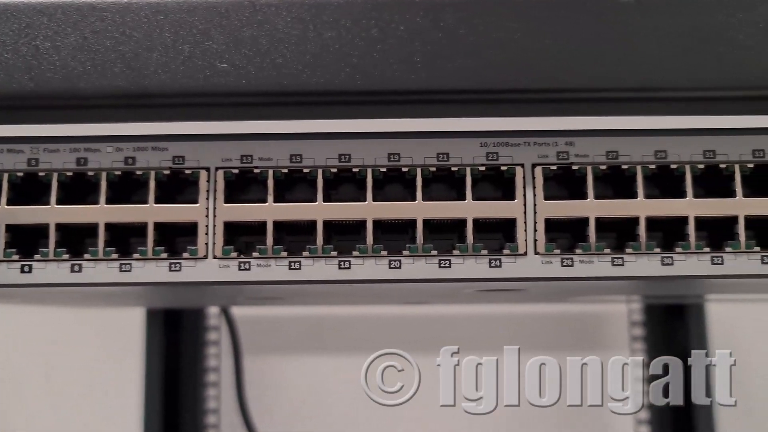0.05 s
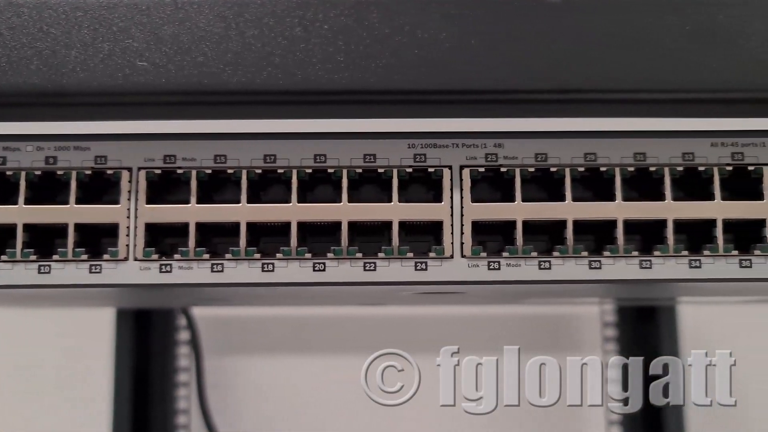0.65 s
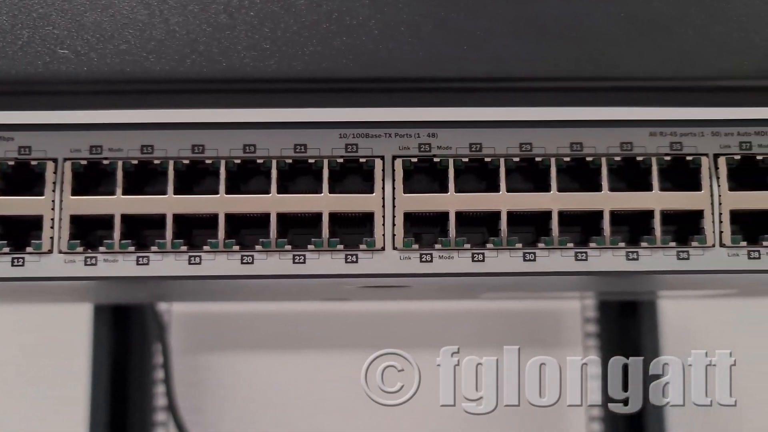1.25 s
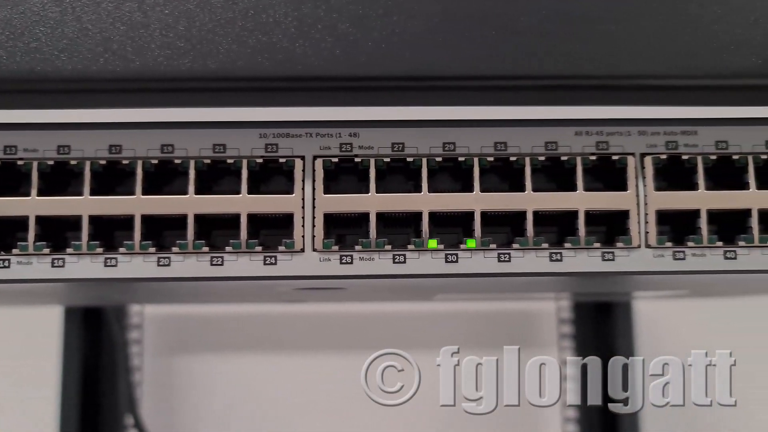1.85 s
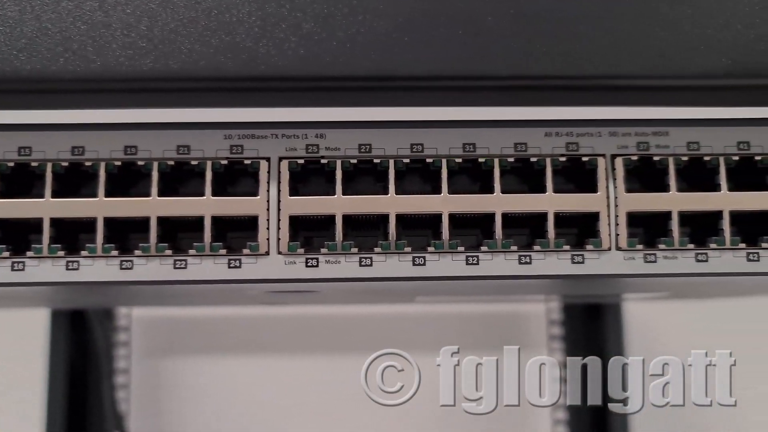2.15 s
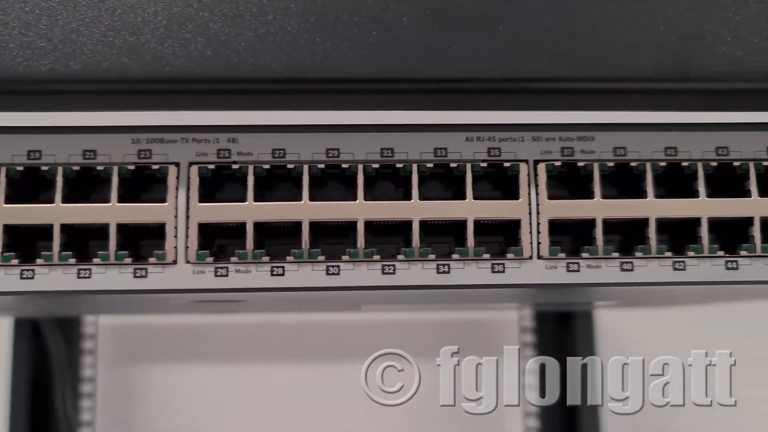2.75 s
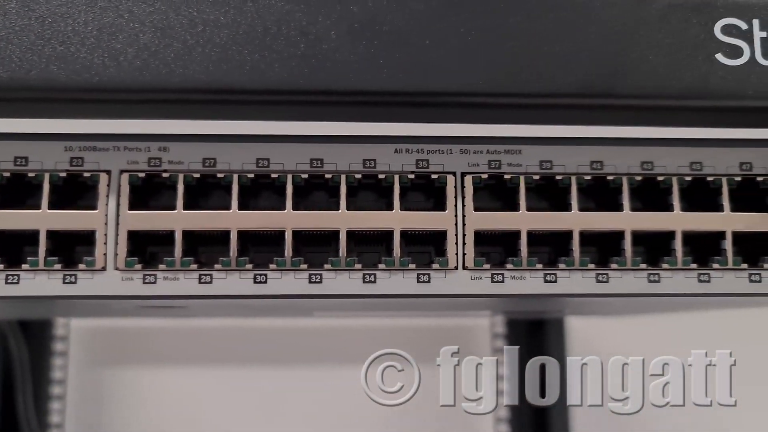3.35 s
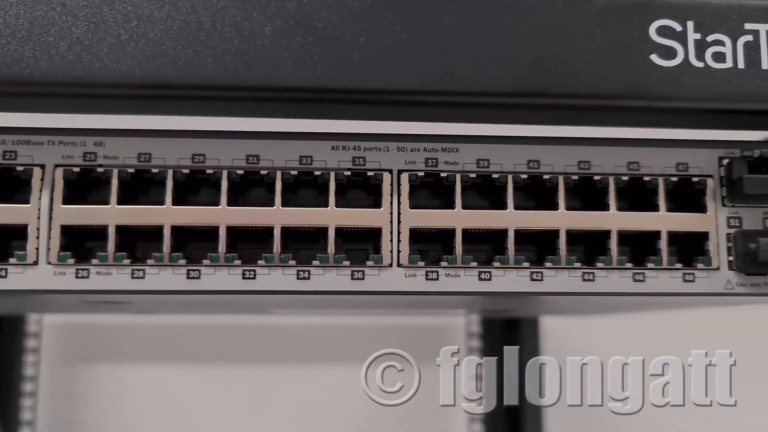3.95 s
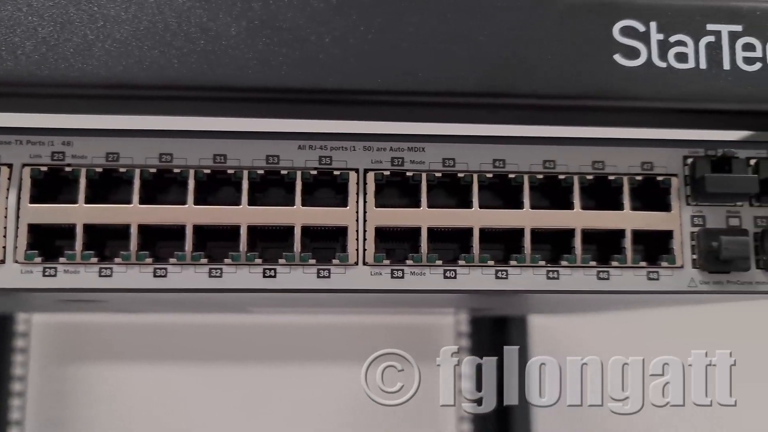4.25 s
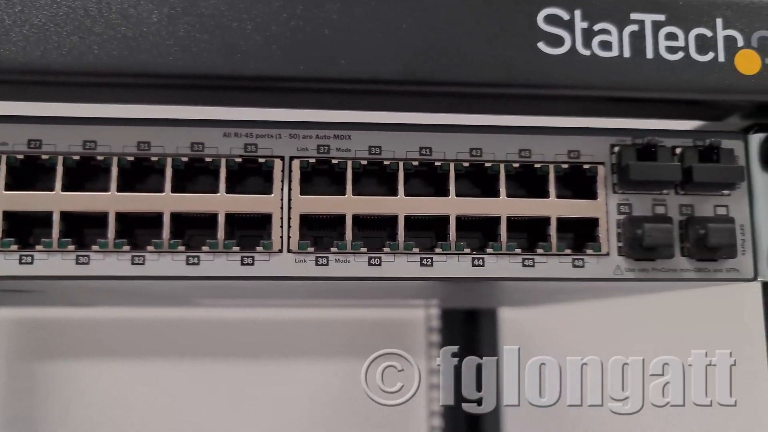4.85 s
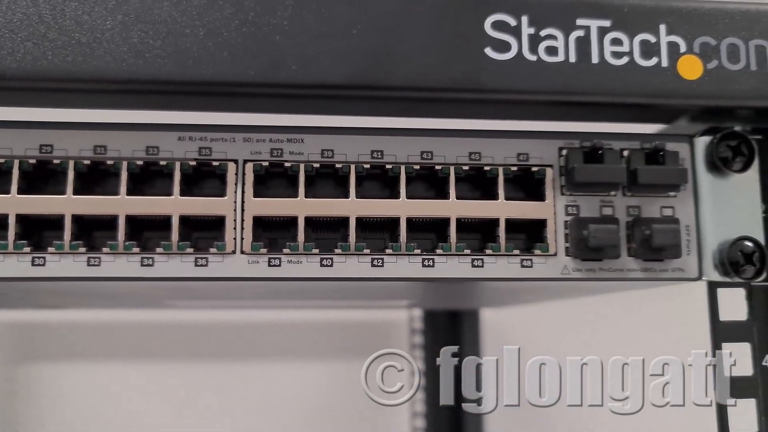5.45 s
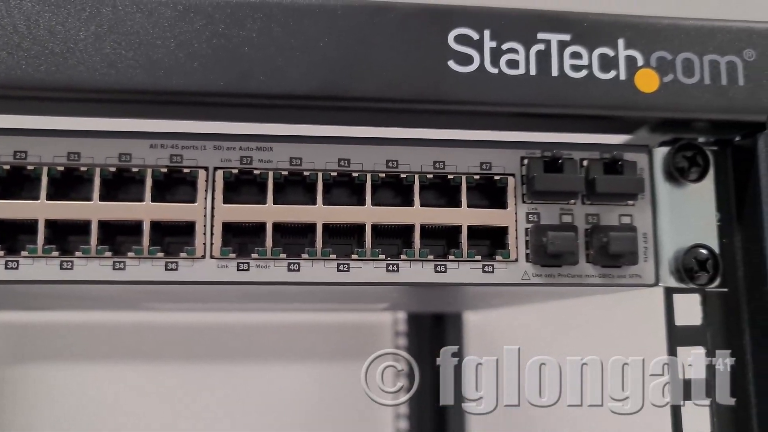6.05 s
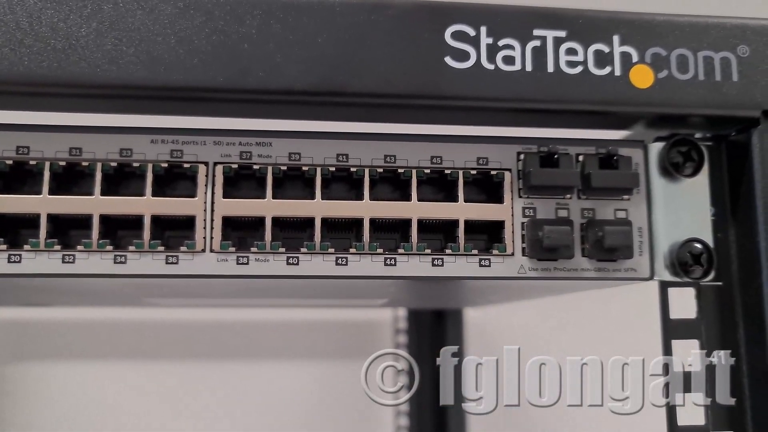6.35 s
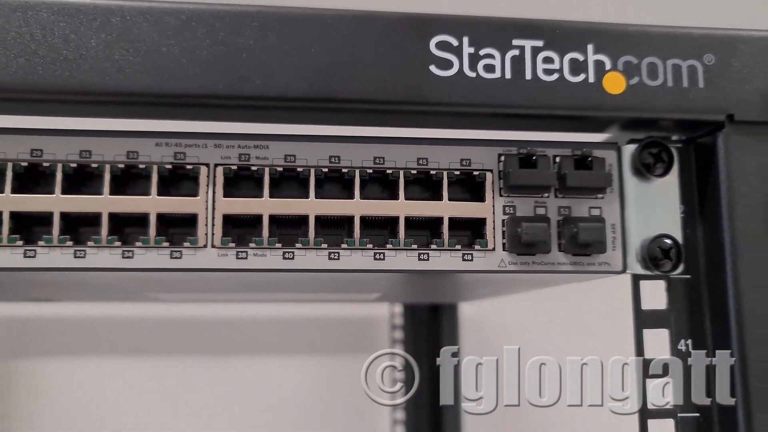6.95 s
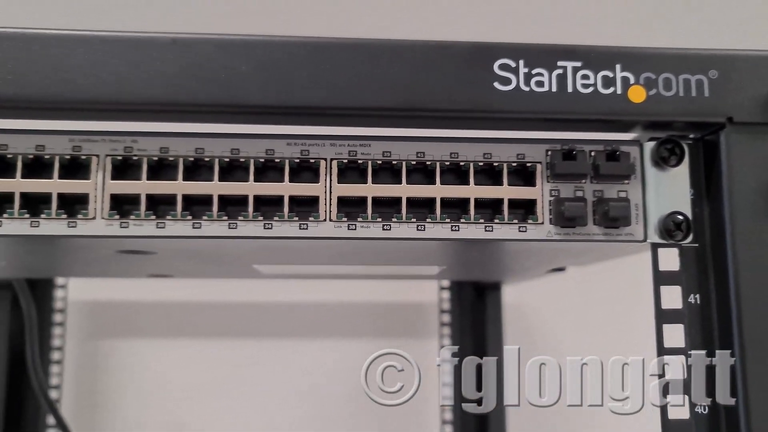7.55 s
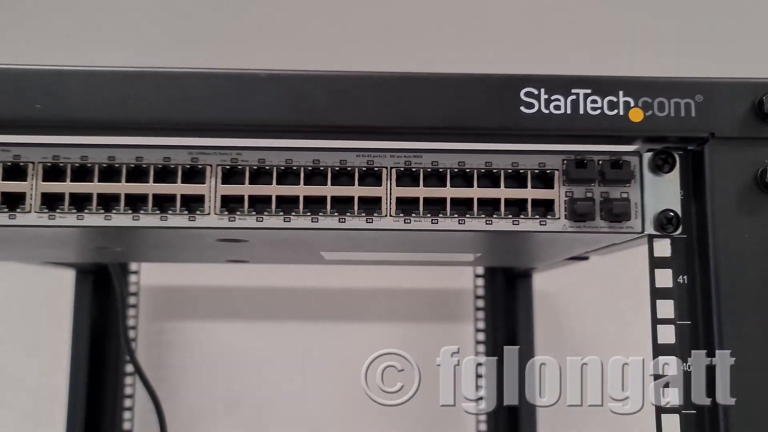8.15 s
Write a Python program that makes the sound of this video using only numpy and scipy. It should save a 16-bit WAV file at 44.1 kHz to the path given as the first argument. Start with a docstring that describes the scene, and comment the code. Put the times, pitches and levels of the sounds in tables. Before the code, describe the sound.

Small cooling fans in a rack-mounted network switch whirr for the whole eight seconds, heard close up in a small room. A mid-pitched hum leads, with several higher whines above it and air hissing through the vents. The speed stays constant, but each tone swells and fades as a hand-held stereo microphone slides along the front. Thin bearing whistles waver faintly, and a very faint, high electronic buzz and hiss hold steady. Underneath, the room's ventilation rumbles with an uneven low throb. At about 1.2 seconds there is one tiny, bright tick. From around 3 seconds the main hum leans to the left. The low drone swells around 4 seconds and again near 6 to 6.5 seconds. As the microphone draws back after 7 seconds, the hum dips briefly at about 7.5 seconds, then returns more centred, and the fans keep running.

```python
"""Network switch fans, close up

In a small room, a hand-held stereo microphone pair slides along the face of a rack-mounted switch, then
draws back. The seven-blade fans whirr, each tone swelling and fading as the microphones cross its standing
waves. Air hisses in the vents, bearings whistle, the room's ventilation rumbles, the electronics whine
faintly, and there is one tiny tick."""
import sys
import numpy as np
from scipy.fft import rfft, irfft, next_fast_len
from scipy.io import wavfile
from scipy.ndimage import map_coordinates

SR = 44100
rng = np.random.default_rng(int(sys.argv[2]) if len(sys.argv) > 2 else 0)


def materialize(psi):
    """Save the field psi as 16-bit PCM at rate SR to the path in sys.argv[1].

    A 1-D psi becomes a single channel; in a 2-D psi each row is a channel.
    """
    bounded = np.clip(np.atleast_2d(psi).T, -1, 1)
    quanta = np.round(bounded * 32767).astype(np.int16)
    wavfile.write(sys.argv[1], SR, quanta)


N = 361619


def amp(db):
    """Decibels to gain."""
    return 10 ** (np.asarray(db) / 20)


def unit(x):
    """Scale to rms 1."""
    return x / np.sqrt(np.mean(x ** 2) + 1e-20)


def along(points, hz):
    """Read (pitch_hz, value) points on a log axis."""
    pitches, values = np.transpose(points)
    return np.interp(np.log(hz + 1), np.log(pitches + 1), values)


def curves(rows):
    """One value per sample for each column after the time."""
    times, *columns = np.transpose(rows)
    return np.array([np.interp(np.arange(N) / SR, times, column) for column in columns])


def wobble(rate):
    """A smooth random curve, rate knots a second."""
    coarse = np.linspace(0, N / SR, 2048)
    smooth = map_coordinates(rng.standard_normal(1024), [coarse * rate], mode="wrap")
    return np.interp(np.arange(N) / SR, coarse, smooth)


# Which microphone each pitch favours: pitch_hz, left_minus_right_db
BALANCE = [(80, -0.3), (200, 0.5), (400, 2.5), (800, -1), (1500, 0), (1900, 4), (2600, 4.5), (3500, 0),
           (4500, -3), (5200, 0), (6000, 2.5), (8800, -5), (11000, 0), (14000, 1.5)]
def sides(hz):
    """Left and right gain at a pitch."""
    half = along(BALANCE, np.atleast_1d(hz)) / 2
    return amp(np.array([half, -half]))


# How alike the two microphones hear the air: pitch_hz, likeness_ratio
LIKENESS = [(40, 0.98), (100, 0.76), (450, 0.94), (740, 0.5), (1200, 0.07)]
def rush(density):
    """Stereo noise shaped by density(hz); the microphones agree only in the bass."""
    size = next_fast_len(N)
    hz = np.fft.rfftfreq(size, 1 / SR)
    spread = np.arccos(along(LIKENESS, hz)) / 2
    mid, side = rfft(rng.standard_normal((2, size))) * [np.cos(spread), np.sin(spread)]
    spectrum = np.array([mid + side, mid - side]) * sides(hz) * density(hz)
    return irfft(spectrum, size)[:, :N] * np.sqrt(SR / 2)


def shaped(spectrum):
    """Stereo noise from (pitch_hz, density_db) points."""
    return rush(lambda hz: amp(along(spectrum, hz)))


def tone(phase, lead, flutter):
    """A stereo tone, the left ahead by lead radians; turbulent inflow shakes its size and phase."""
    size = 1 + flutter * wobble(rate=22)
    phase = phase + rng.uniform(0, 2 * np.pi) + flutter * wobble(rate=22)
    return np.sqrt(2) * size * np.sin([phase + lead / 2, phase - lead / 2])


def roaming(phase, hz, fade_db, flutter):
    """A tone whose level and phase drift at random, as when microphones cross standing waves."""
    spread = np.arccos(along(LIKENESS, hz))
    lead = spread * (rng.choice([-1, 1]) + 0.5 * wobble(rate=0.85))
    fading = unit(amp(fade_db * np.array([wobble(rate=1.33), wobble(rate=1.57)])))
    return sides(hz) * fading * tone(phase, lead, flutter)


# Blade-passing tone at the microphones, before trim: time_s, left_db, right_db
BLADE_LEVELS = [(0, -43.5, -43.5), (1.3, -44, -46), (1.4, -40.5, -43), (1.8, -44, -47), (2, -42, -44.5),
                (3.3, -46, -52.5), (3.5, -42.5, -48), (5.29, -44.5, -55), (5.49, -42, -51),
                (5.69, -44.5, -54.5), (6.79, -46.5, -57), (7.39, -44.5, -50), (7.49, -57, -66),
                (7.69, -49, -49.5), (8.19, -45.5, -47.5)]
def blade_tone(shaft, path, blades=7, trim_db=0.76):
    """Each passing blade pulses the air; the left microphone gains phase along the path."""
    return amp(curves(BLADE_LEVELS) + trim_db) * tone(blades * shaft, -0.12 + 0.75 * path, flutter=0.059)


# Loudest whines by shaft multiple, before trim: time_s, left_db, right_db, left_lead_rad
FAN_WHINES = {30: [(0.0, -50, -48.5, 2.65), (0.9, -51.5, -49, 4.1), (2.4, -58, -51, 2.8),
              (2.9, -64.2, -50, 4.9), (3.1, -57.5, -49.5, 8.3), (5.7, -50, -57.5, 5.6),
              (7.1, -50.5, -53, 6.6), (7.3, -53.8, -58, 7.1), (8.1, -52, -55.5, 5.6)],
              36: [(0.0, -60, -57.5, 1.5), (1.9, -54, -46, 3), (2.5, -57, -52, 2.6), (3.2, -53.5, -59, 2.5),
              (5.2, -51.5, -54, 1.8), (6.1, -61.2, -53, 1.0), (7.1, -58.5, -54, -0.7),
              (7.5, -51.5, -61.5, 1.5), (8.1, -63, -67, 4)], 42: [(0.0, -65, -67.6, -1.5),
              (1.6, -61, -82.5, -5), (1.7, -63.6, -81.1, 3), (2.4, -62, -79, 1.8), (2.8, -54.5, -64.8, 3),
              (4.8, -53.5, -59.3, 2), (6.2, -54.0, -68, 4), (7.8, -51, -62.1, 0.9), (8.1, -58.5, -76, 0)]}
def fan_whines(shaft, trim_db=0.5):
    """Blades and motor poles sound three high multiples of the shaft rate."""
    out = 0
    for multiple, rows in FAN_WHINES.items():
        *level_db, lead = curves(rows)
        out += amp(np.array(level_db) + trim_db) * tone(multiple * shaft, lead, flutter=0.087)
    return out


def standing_wave(path, db, echo, node, spacing):
    """Gain along the path of a direct wave plus its echo; they partly cancel at evenly spaced nodes."""
    return amp(db) * np.abs(1 - np.clip(echo, 0, 1) * np.exp(2j * np.pi * (path - node) / spacing))


# Standing waves in front of the rack, before trim: shaft_multiple, then for left and for right
# (direct_db, echo_ratio, node_faces, spacing_faces), then left_lead_rad, lead_rad_per_face
OVERTONE_WAVES = [(12, -60.5, 0.71, 0.58, 0.93, -61, 0.91, 1.48, 1.87, 2, -0.06),
                  (24, -68, 0.54, 1.1, 1.26, -59.5, 0.19, 1.2, 1.05, -3, 0.76),
                  (31, -61.5, 0.96, 0.22, 1.5, -66, 0.32, 0.77, 2.5, 0, 0.4),
                  (32, -60, 0.62, 0.02, 1.45, -72, 0.29, 0.45, 1, -2, 0.4),
                  (40, -62.5, 0.31, 0.73, 2.4, -69.5, 0.45, 0.81, 1.6, 1.2, 0.2)]
def fan_overtones(shaft, path, trim_db=0.75):
    """Clear overtones dip as each microphone passes through their nodes."""
    out = 0
    for multiple, *waves, lead, lead_slope in OVERTONE_WAVES:
        gains = np.array([standing_wave(path, *wave) for wave in np.reshape(waves, (2, -1))])
        out += amp(trim_db) * gains * tone(multiple * shaft, lead + lead_slope * path, flutter=0.093)
    return out


# Faint tones of the main fan, before trim: shaft_multiple, level_db
WEAK_TONES = [(4, -68), (5, -65), (9, -68), (10, -67), (13, -72), (14, -71), (16, -72), (17, -68),
              (20, -74), (28, -64), (29, -71), (33, -67), (34, -68), (35, -66), (38, -71), (41, -65),
              (43, -73)]
def weak_tones(shaft, mean_hz, trim_db=0.3):
    """Faint shaft harmonics drift in and out at each microphone."""
    return sum(amp(db + trim_db) * roaming(multiple * shaft, multiple * mean_hz, fade_db=2.5, flutter=0.28)
               for multiple, db in WEAK_TONES)


def whirr(shaft, gain_db=8.5, size=1024):
    """Small flaws of the blades repeat every turn: a dense comb of faint lines in a drifting mix."""
    hz = np.arange(size // 2 + 1) * SHAFT_SPEED[0][1]
    colour = sides(hz) * amp(along(AIRFLOW, hz)) * (hz > 0)
    # three random patterns, one turn long, for each microphone
    patterns = irfft(rfft(rng.standard_normal((3, 2, size))) * colour) * np.sqrt(size / 2)
    angle = np.arange(size) * 2 * np.pi / size
    mix = np.array([wobble(rate=0.91) for _ in patterns])
    mix /= np.sqrt(np.sum(mix ** 2, axis=0) + 0.14)
    out = 0
    for share, pair in zip(mix, patterns):
        out += share * np.array([np.interp(shaft, angle, side, period=2 * np.pi) for side in pair])
    return amp(gain_db) * out


# Rotation of the main fan: time_s, speed_hz
SHAFT_SPEED = [(0.0, 56.822), (0.6, 56.791), (0.7, 56.754), (1.2, 56.806), (2.8, 56.849), (3.0, 56.884),
               (3.2, 56.956), (3.7, 56.861), (3.9, 56.915), (5.1, 56.813), (5.5, 56.865), (5.7, 56.84),
               (6.0, 56.922), (6.3, 56.906), (6.9, 57.005), (7.6, 56.832), (7.9, 56.86), (8.1, 56.932)]
def main_fan(path):
    """One slightly unsteady shaft drives all the tones of the loudest fan."""
    speed = curves(SHAFT_SPEED)[0] + 0.0066 * wobble(rate=6)
    shaft = 2 * np.pi * np.cumsum(speed) / SR
    clear_tones = blade_tone(shaft, path) + fan_whines(shaft) + fan_overtones(shaft, path)
    return clear_tones + weak_tones(shaft, speed.mean()) + whirr(shaft)


# Other fans in the case: pitch_hz, level_db
NEIGHBOUR_TONES = [(319, -63), (375, -60), (434, -61), (463, -64), (1688, -67), (1755, -67), (2500, -74),
                   (3275, -74), (5798, -87), (5965, -89)]
def other_fans():
    """Neighbouring fans wander in speed together and beat against the main one."""
    time = np.cumsum(1 + 0.0005 * wobble(rate=2.5)) / SR
    return sum(amp(db) * roaming(2 * np.pi * hz * time, hz, fade_db=5.5, flutter=0.29)
               for hz, db in NEIGHBOUR_TONES)


# Whistling spots along the path: pitch_hz, loudest_db, place_faces, loss_db_per_face
BEARING_WHISTLES = [(3125, -70, 1.0, 14), (3415, -70, 0.49, 43), (3467, -66.5, 0.53, 30),
                    (3430, -76, 0.72, 15), (3440, -64, 1.8, 22), (5560, -75, 0.29, 12),
                    (5570, -77.5, 1.3, 13), (5450, -83, 1.15, 14)]
def bearings(path, waver=0.0015, flicker_db=2.0):
    """Thin whistles waver and flicker, each growing as the microphones near its place."""
    out = 0
    for hz, db, place, loss_db in BEARING_WHISTLES:
        phase = 2 * np.pi * hz * np.cumsum(1 + waver * wobble(rate=7)) / SR
        flicker = unit(amp(flicker_db * wobble(rate=11)))
        gain = amp(db - loss_db * np.abs(path - place))
        out += gain * flicker * roaming(phase, hz, fade_db=-1.2, flutter=0.49)
    return out


# Air through the fans and vent holes, close up: pitch_hz, density_db
AIRFLOW = [(60, -100), (150, -80.5), (290, -79.5), (450, -77), (620, -84), (980, -83), (1450, -88.5),
           (2050, -84), (2500, -90), (3350, -89), (3750, -98), (5150, -103), (5700, -102), (6400, -108),
           (7400, -130)]
# Air resonances of the steel case: pitch_hz, width_hz, peak_density_db, place_faces, loss_one_face_away_db
CASE_RESONANCES = [(287, 41, -75, 0.47, 112), (394, 62, -70.5, 0.35, 5), (955, 103, -82, 0.55, 23),
                   (1160, 220, -85.5, 0.57, 150), (215, 39, -77, 0.55, 150), (1754, 200, -77, 1.37, 3),
                   (3100, 33, -79.5, 0.99, 25), (2920, 350, -89.5, 0.4, 0), (3405, 30, -79.5, 0.43, 75),
                   (4540, 550, -99.5, .2, 1), (5560, 390, -104, 0.37, 0), (5900, 370, -104, 0.02, 30)]
# Swell of all the rushing air: time_s, gain_db
DRAUGHT = [(0, 1.5), (2.2, -0.56), (3, 1), (3.8, 0.4), (5.8, 0.5), (7.1, 0.1), (8.2, 0.9)]
def vents(path):
    """Rushing air rings the case; each resonance is loudest at its own place along the path."""
    air = shaped(AIRFLOW)
    for centre, width, db, place, loss_db in CASE_RESONANCES:
        band = rush(lambda hz: 1 / (1 + 2 * ((hz - centre) / width) ** 2))
        air += amp(db - loss_db * (path - place) ** 2) * band
    return air * amp(curves(DRAUGHT)[0] + 0.66 * wobble(rate=4.83))


# Low drone of the room, before trim: time_s, level_db
ROOM_DRONE = [(0, -45.2), (0.4, -48), (0.9, -42.5), (1.6, -47.5), (1.8, -44.5), (3.9, -49.5), (4.1, -40.5),
              (4.39, -48), (4.69, -43.5), (4.99, -55), (5.99, -38), (6.39, -38), (6.69, -61), (7.29, -45.5),
              (7.49, -67), (8.19, -45)]
# Rumble of the room: pitch_hz, density_db
ROOM_RUMBLE = [(12, -84), (20, -68), (28, -59.5), (35, -74), (55, -63.5), (75, -64), (98, -65),
               (115, -76.5), (160, -84), (500, -150)]
def ventilation(drone_hz=46.0, trim_db=-0.7, rumble_follows=0.032):
    """The room's ventilation throbs, swells and sinks; a broad rumble follows it a little."""
    drone_db = curves(ROOM_DRONE)[0]
    swell_db = drone_db - drone_db.mean()
    unrest = np.clip(amp(-swell_db), 0, 1)  # the drone steadies as it grows loud
    phase = 2 * np.pi * np.cumsum(drone_hz + 2.22 * unrest * wobble(rate=4.6)) / SR
    throb = unit(1 + 0.24 * unrest * wobble(rate=9))
    drone = amp(drone_db + trim_db) * throb * tone(phase, lead=0.27, flutter=0.091)
    return drone + amp(rumble_follows * swell_db) * shaped(ROOM_RUMBLE)


# Outline of the electronic whine: pitch_hz, line_level_db
WHINE_SPECTRUM = [(5000, -93), (6800, -96), (8300, -99), (9200, -93), (11000, -94), (12500, -102)]
def electronics(spacing_hz=250):
    """The electronics give a thin, steady buzz of high, evenly spaced lines."""
    t = np.arange(SR) / SR
    one_second = 0
    for hz in spacing_hz * np.arange(20, 51):
        phase = 2 * np.pi * (hz * t + 0.35 * rng.random((2, 1)))
        one_second += amp(along(WHINE_SPECTRUM, hz)) * sides(hz) * np.sin(phase)
    return np.sqrt(2) * np.tile(one_second, N // SR + 1)[:, :N]


# Self-noise of the microphones: pitch_hz, density_db
SELF_NOISE = [(3000, -120), (7300, -116), (8600, -114.5), (9700, -112), (10700, -105.5), (14000, -106.5),
              (15700, -109.5)]
def microphone_hiss():
    """The microphones add their own steady, high hiss."""
    return shaped(SELF_NOISE)


# A lone tick: start_s, level_db, t60_s
TICK = (1.171, -53, .06)
def tick(start_s, level_db, t60_s):
    """A tiny burst of bright noise dies away at once."""
    age = np.arange(N) / SR - start_s
    # pitch_hz, relative_db
    colour = [(3000, -25), (5000, 0), (6400, -3), (8000, -24), (11000, -10), (13500, -15), (16000, -22)]
    return amp(level_db - 60 * np.abs(age) / t60_s) * (age > 0) * unit(shaped(colour))


# The microphones slide, linger, then draw back: time_s, travel_faces (lengths of the switch's face)
MICROPHONE_PATH = [(0, 0), (5.5, 1), (7, 1.2), (8.2, 1.6)]
def scene():
    """The switch and the room at the moving microphone pair."""
    path = curves(MICROPHONE_PATH)[0]
    cooling = main_fan(path) + other_fans() + bearings(path) + vents(path)
    return cooling + ventilation() + electronics() + microphone_hiss() + tick(*TICK)


def record(dry, top_hz=15740):
    """The recorder keeps nothing above its band limit."""
    size = next_fast_len(N + SR // 4)
    passband = np.fft.rfftfreq(size, 1 / SR) < top_hz
    return irfft(rfft(dry, size) * passband, size)[:, :N]


dry = scene()
out = record(dry)
materialize(out)
```